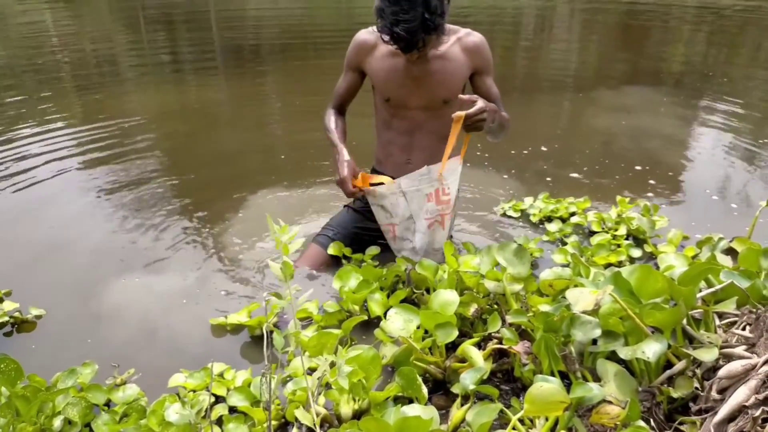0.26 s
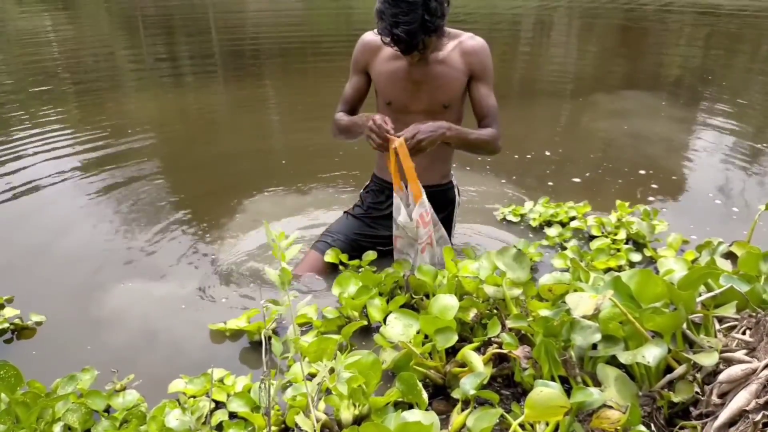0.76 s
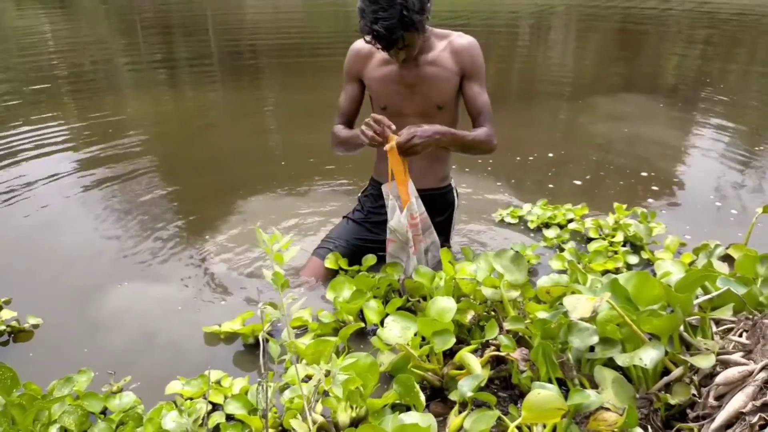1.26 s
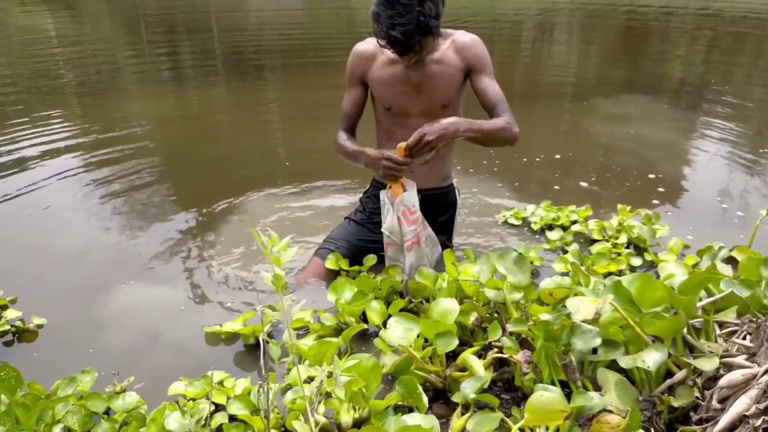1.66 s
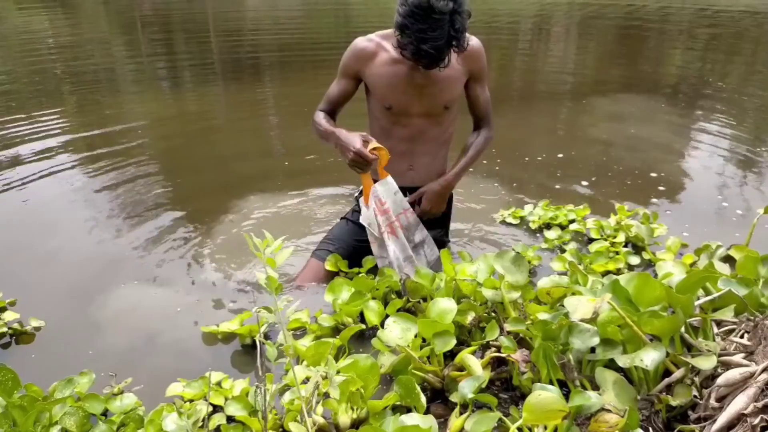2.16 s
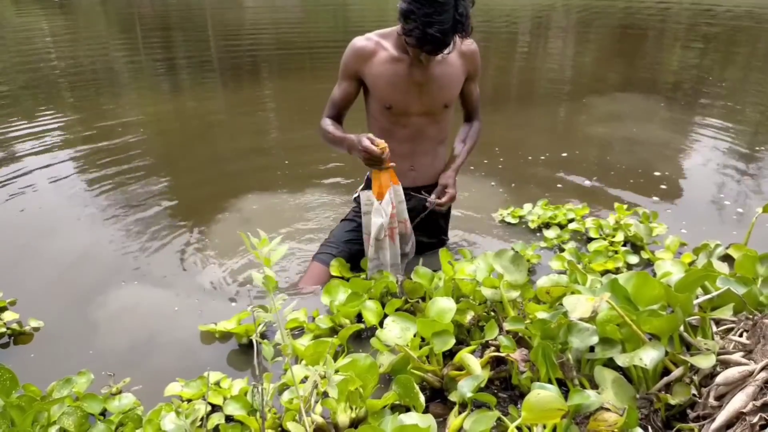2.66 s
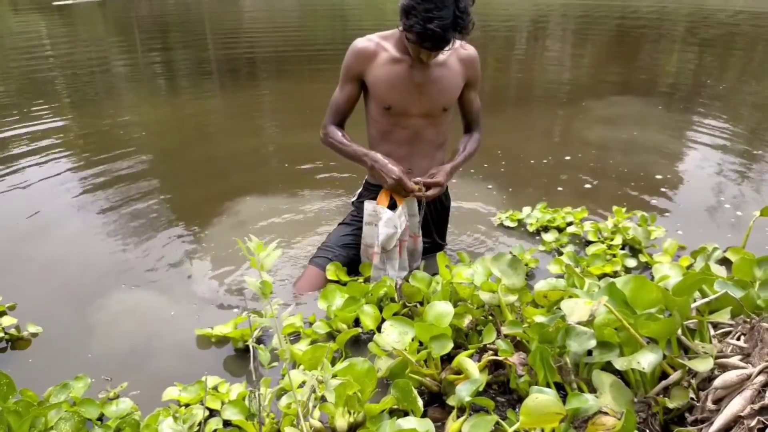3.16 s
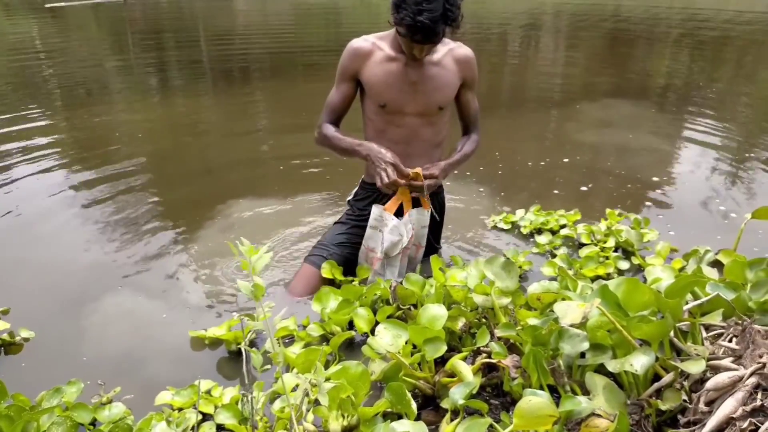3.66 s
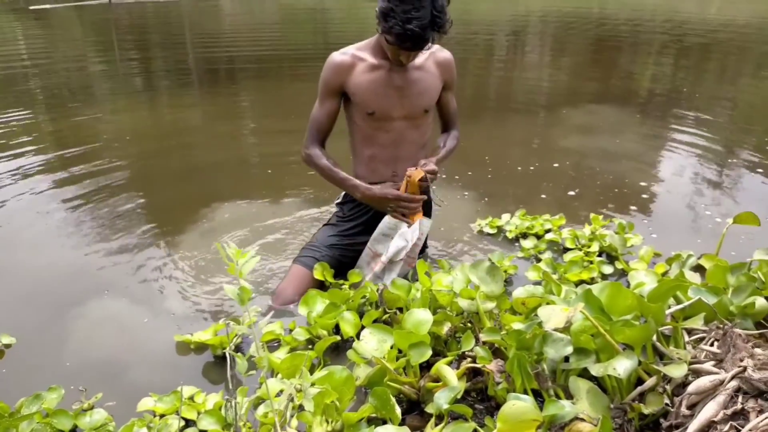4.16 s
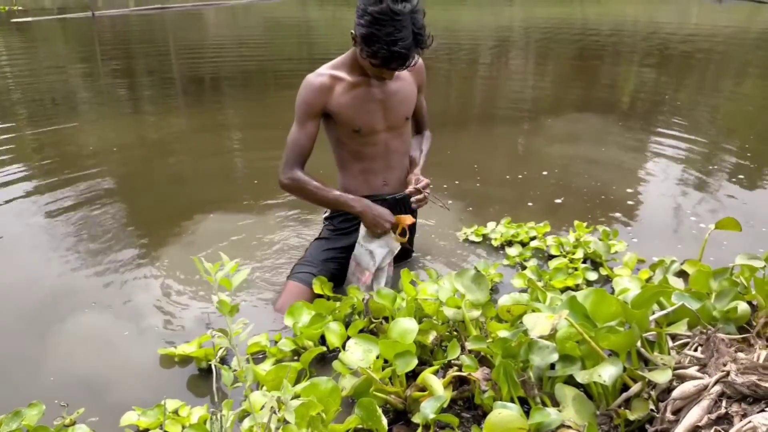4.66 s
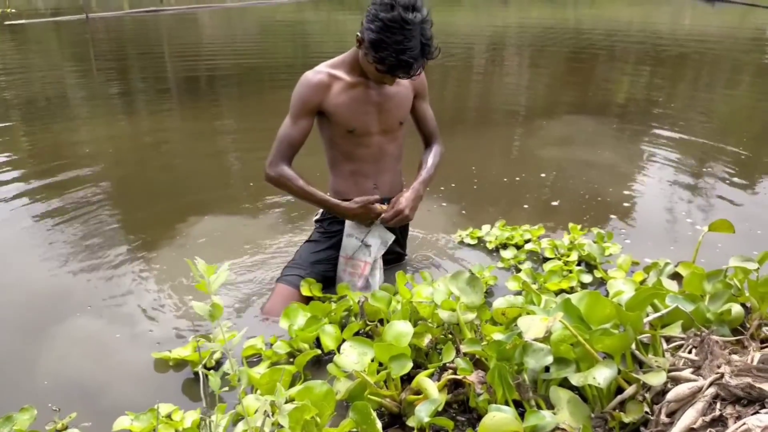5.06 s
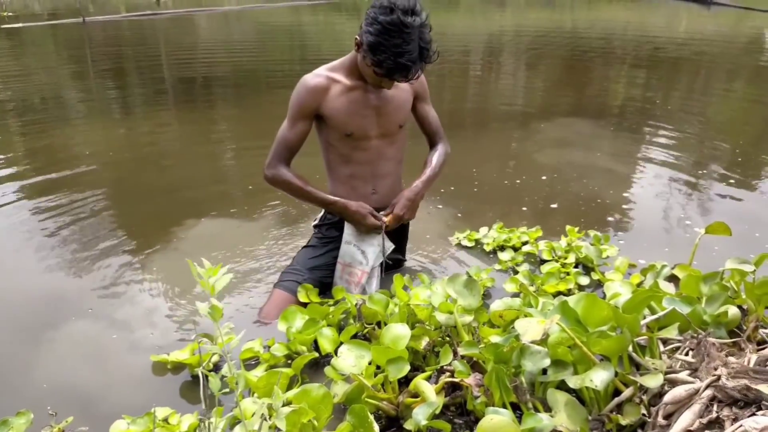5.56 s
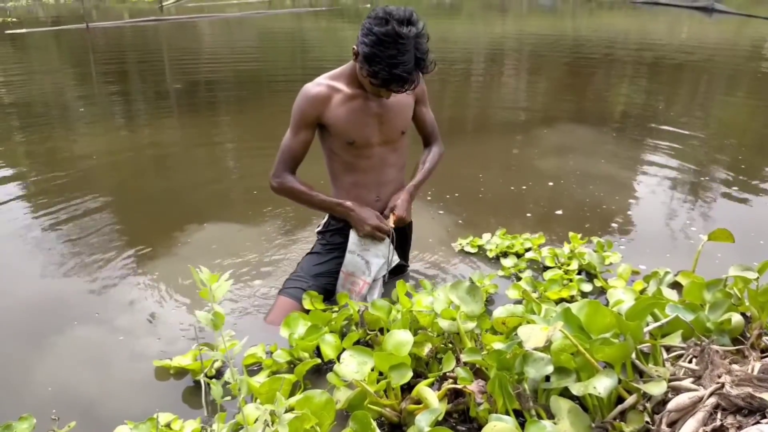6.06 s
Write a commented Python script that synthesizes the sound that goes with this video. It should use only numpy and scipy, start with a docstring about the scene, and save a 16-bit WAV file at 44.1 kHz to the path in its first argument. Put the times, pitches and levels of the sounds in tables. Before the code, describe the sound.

Someone in a still pond handles a crackling plastic bag as water plops, birds whistle, a distant engine thuds and low wind rumbles.

```python
"""A breeze buffets the microphone over the thud of a far single-cylinder engine and a soft wash of leaves.
Someone thigh-deep in a quiet pond handles a wet plastic bag: buckling film crinkles and snaps, bubbles plop and lap.
A barbet repeats its falling notes and a songbird whistles two thin phrases, gliding tones echoed by the trees.
Wind is shaped noise with single pressure swings; it dies down midway and freshens towards the end."""
import sys
import numpy as np
from scipy import signal
from scipy.fft import rfft, irfft, next_fast_len
from scipy.io import wavfile
from scipy.ndimage import uniform_filter1d

SR = 44100
rng = np.random.default_rng(int(sys.argv[2]) if len(sys.argv) > 2 else 0)


def store_pcm(level_fs):
    """Save levels as 16-bit WAV."""
    pcm = np.round(np.clip(level_fs, -1, 1) * 32767).astype(np.int16)
    wavfile.write(sys.argv[1], SR, np.atleast_2d(pcm).T)


N = 277859
T = np.arange(N) / SR  # time of each sample [s]


def undb(db):
    """Decibels to gain."""
    return 10 ** (np.asarray(db) / 20)


def unit(x):
    """Scale to rms 1."""
    return x / np.sqrt(np.mean(x ** 2) + 1e-30)


def curves(table):
    """Draw the columns of a table as automation curves, sample by sample."""
    s, *columns = np.transpose(table)
    return [np.interp(T, s, column) for column in columns]


def add(out, s, x):
    """Mix x into out at time s, kept inside the scene."""
    i = int(np.clip(s * SR, 0, N - 1))
    out[i:i + len(x)] += x[:N - i]


def walk(rate):
    """Smooth random drift with rms 1, taking about rate new values a second."""
    hold = max(int(SR / rate), 1)
    steps = rng.standard_normal(N)[np.arange(N) // hold]
    return unit(uniform_filter1d(steps, hold))


def coloured(points):
    """Noise with the given (frequency [Hz], level [dB]) spectrum, rms 1."""
    hz, db = np.transpose(points)
    length = next_fast_len(N, True)
    f = np.maximum(np.fft.rfftfreq(length, 1 / SR), 1)
    spectrum = rfft(rng.standard_normal(length))
    spectrum = spectrum * undb(np.interp(np.log(f), np.log(hz), db))
    return unit(irfft(spectrum)[:N])


def band(x, lo_hz, hi_hz, order=2):
    """Butterworth band-pass."""
    edges = [lo_hz, min(hi_hz, SR / 2 - 1)]
    return signal.sosfilt(signal.butter(order, edges, "band", fs=SR, output="sos"), x)


def trees(x, echoes, wet_db, t60):
    """Direct sound, distinct (delay [s], level [dB]) echoes from the bank, and a scattered tail from the trees."""
    t = np.arange(SR) / SR
    tail = rng.standard_normal(SR) * undb(-60 * t / t60) * (1 - np.exp(-t / 0.0012))
    response = undb(wet_db) * unit(tail) / np.sqrt(SR)
    response[0] = 1
    for s, db in echoes:
        response[int(s * SR)] += undb(db)
    return signal.fftconvolve(x, response)[:N]


def gust(peak_s, length, rise=0.39, fall=0.37, sharpness=3.9):
    """A broad-topped swell with steep sides; rise and fall are shares of its length."""
    u = (T - peak_s) / length
    return np.exp(-np.maximum(-u / rise, u / fall) ** sharpness)


def evened(x, window_s=0.07, slack=0.018):
    """Take the slow swells out of a noise and keep its fast texture."""
    power = uniform_filter1d(x ** 2, int(window_s * SR))
    return x / np.sqrt(power + slack)


# spectrum of the moving air: (frequency [Hz], relative level [dB per Hz])
AIRFLOW_SPECTRUM = [(15, 12.5), (30, 0), (50, 3), (80, -5), (120, -3), (170, -13), (250, -31.5),
                    (350, -45.5), (500, -56), (900, -67)]
# steady breeze between the gusts: (time [s], level before trim [dB])
BREEZE_LEVEL = [(0.02, -46.5), (0.61, -52.5), (1.98, -49), (2.92, -68), (4.02, -68.5), (4.15, -62),
                (4.6, -58.5), (5.51, -50.5), (5.68, -50), (5.8, -46), (6.15, -39.5), (6.3, -51)]
# gusts on the microphone:
# (peak time [s], length [s], rumble before trim [dB], flutter before trim, relative to the rumble [dB])
GUST_EVENTS = [(0.006, 0.18, -38.5, -9), (0.392, 0.32, -48, -25), (0.886, 0.037, -40, -16.5),
               (1.14, 0.042, -46, -20), (1.418, 0.14, -39, -32), (1.606, 0.058, -43.5, -14.5),
               (2.5, 0.39, -52.5, -31), (3.413, 0.21, -51.5, -24), (4.106, 0.27, -44.5, -26.5),
               (4.33, 0.072, -45.5, -25), (4.653, 0.046, -44, -29), (4.889, 0.099, -37, -16),
               (5.054, 0.19, -42.5, -16.5), (5.28, 0.25, -41, -18.5), (5.486, 0.24, -36, -14),
               (5.612, 0.055, -32, -12), (5.791, 0.13, -36.5, -13.5), (5.989, 0.15, -36.5, -23),
               (6.144, 0.24, -41, -9.5)]


def wind(breeze_db=1, gust_db=-2, eddy_db=4.5, breeze_eddy_db=-18, unrest_db=3.5, flutter_db=5.0, calm_db=-72):
    """Gusts ride on a restless breeze: large eddies rumble, small ones flutter and die out in calm air."""
    unrest = unrest_db * np.clip(walk(11), -2, 1)
    breeze = undb(curves(BREEZE_LEVEL)[0] + breeze_db + unrest)
    gusts, swirls = np.zeros(N), np.zeros(N)
    for s, length, db, small_db in GUST_EVENTS:
        swell = gust(s, length)
        gusts += undb(db + gust_db) * swell
        swirls += undb(db + small_db + eddy_db) * swell

    flow = coloured(AIRFLOW_SPECTRUM)
    flutter = flutter_db * walk(40)
    large = evened(unit(band(flow, 16.2, 96.2, order=3) * undb(flutter / 2)))
    small = evened(unit(band(flow, 192.0, 2200, order=3) * undb(flutter)))
    large_level = np.hypot(breeze, gusts)
    small_level = np.hypot(undb(breeze_eddy_db) * breeze, swirls)
    return large_level * large + np.maximum(small_level - undb(calm_db), 0) * small


def puff(hz):
    """One swing of pressure, up then down, strongest around hz; centred in a tenth of a second."""
    u = 2 * np.pi * hz * (np.arange(SR // 10) / SR - 1 / 20)
    return -u * np.exp((1 - u ** 2) / 2)


def stray_eddies(count=14, lowest_hz=55, spread_db=5, shed_db=-17):
    """Buffets at random moments, as strong as the breeze allows; columns as in BUFFET_HITS."""
    eddies = []
    for when, size, strength in rng.random((count, 3)):
        s = when * N / SR
        breeze_db = np.interp(s, *np.transpose(BREEZE_LEVEL))
        eddies.append((s, lowest_hz * 2 ** size, breeze_db + spread_db * strength, shed_db))
    return eddies


# single hard buffets, centred no earlier than 0.05 s:
# (time [s], eddy pitch [Hz], level before trim [dB], basic drop to each smaller eddy [dB])
BUFFET_HITS = [(.028, 96, -35.5, -33), (0.066, 110, -43.5, -25), (0.093, 107, -42, -24),
               (0.126, 64.7, -33, -17), (.289, 59.5, -37, -8), (0.359, 56, -32, -14), (.404, 81, -35, -9),
               (0.423, 90, -36, -16), (0.445, 84.5, -41.5, -19), (0.888, 110, -57, -14),
               (1.264, 104, -50, -9), (1.452, 123, -41.5, -19), (1.603, 140, -51, -18),
               (4.111, 99, -43, -20), (4.144, 122, -43.5, -20), (4.662, 70.5, -37.5, -16),
               (4.869, 130, -42, -21), (4.878, 101, -33, -7), (4.905, 79, -43, -10), (5.033, 85.4, -34, -5),
               (5.271, 70.5, -41, -6), (5.39, 99, -34, -24), (5.425, 127, -32, -15), (5.441, 105, -35, -15),
               (5.464, 70, -36, -19), (5.499, 123, -32, -14), (5.545, 98, -35, -10.5),
               (5.609, 119, -25, -6.5), (5.62, 90, -26.5, -9), (5.721, 99, -36.5, -21),
               (5.759, 180, -40, -24), (5.787, 94, -28.5, -18), (5.817, 88, -32.5, -20),
               (5.889, 107, -38.5, -7), (5.961, 85, -40, -11), (6.02, 49.3, -26, -8),
               (6.108, 106.5, -35.5, -17), (6.173, 106, -31, -12), (6.216, 109, -32.5, -8),
               (6.228, 151, -49, -13)]


def buffets(gain_db=-1, step=1.525, scatter_s=0.00351, count=5):
    """An eddy strikes the port squarely and breaks into ever smaller, weaker ones."""
    out = np.zeros(N)
    blows = list(BUFFET_HITS) + stray_eddies()
    for (s, hz, db, shed_db), chance in zip(blows, rng.standard_normal((len(blows), count))):
        for k, offset in enumerate(chance):
            centre = s + scatter_s * offset * min(k, 1)  # the first eddy is not scattered
            level = undb(db + gain_db + k * shed_db - k * k / 2)
            add(out, centre - 1 / 20, (-1) ** k * level * puff(hz * step ** k))
    return out


def case(x, hz=364, width_hz=33, ring_db=-6):
    """Wind that strikes the recorder makes its case ring faintly at one resonance."""
    return x + undb(ring_db) * band(x, hz - width_hz / 2, hz + width_hz / 2, order=1)


# engine speed: (time [s], firing rate [firings per second])
FIRING_RATE = [(0, 17.6), (.8, 17.88), (1.6, 18.0), (2.9, 18.2), (4.0, 18.42), (5.0, 18.65), (6.3, 18.8)]
# paths of each exhaust thud: (delay [s], pitch [Hz], relative level [dB])
EXHAUST_PATHS = [(0, 112.5, 0.5), (0.0154, 125, -13.5), (0.031, 80, -8)]
# scattered engine sound: (frequency [Hz], relative level [dB per Hz])
DRONE_SPECTRUM = [(25, -5.5), (60, -1), (130, -4.5), (200, -10), (300, -13), (420, -28.5), (900, -38)]


def engine(level_db=-59, scatter_db=2.5, drone_db=-70, start_turn=.475):
    """One exhaust thud a firing; moving air makes each path fade on its own and scatters the rest into a drone."""
    rate, = curves(FIRING_RATE)
    turns = np.floor(np.cumsum(rate) / SR + start_turn)  # start_turn: share of a firing cycle gone at 0 s
    firings = np.diff(turns, prepend=turns[0])
    out = undb(drone_db) * coloured(DRONE_SPECTRUM)
    for s, hz, db in EXHAUST_PATHS:
        strength = undb(level_db + db + scatter_db * walk(20))
        add(out, s, signal.fftconvolve(firings * strength, puff(hz), "same"))
    return out


# leaves and moving water: (time [s], level at 1.5-3 kHz before trim [dB])
RUSTLE_LEVEL = [(0.06, -71), (.45, -72.5), (1.03, -74.5), (1.5, -72.5), (2.34, -74.5), (2.7, -73.5),
                (2.89, -79.5), (4.35, -74), (4.46, -77.5), (4.82, -75), (5.06, -75), (5.39, -72.5),
                (5.55, -74), (5.66, -73), (6.02, -73.5), (6.3, -73.5)]
# fine hiss above the rustle: (time [s], level at 8.5-15 kHz before trim [dB])
HISS_LEVEL = [(0.06, -78), (0.39, -78), (0.82, -81.5), (2.63, -82), (2.79, -83), (3.0, -88), (4.04, -89.5),
              (4.14, -87), (6.3, -84)]
# spectrum of rustle and hiss: (frequency [Hz], relative level [dB per Hz])
RUSTLE_SPECTRUM = [(240, 10.5), (400, -3), (577, 2), (652, -1), (833, 0.5), (970, -1.5), (1030, -1.5),
                   (1200, -1.5), (1810, -4), (2500, -4.5), (3240, -10.5), (4400, -21), (5880, -32),
                   (11900, -30.5), (15400, -27)]


def leaves(rustle_db=-3.5, hiss_db=0.5, split_hz=5200):
    """A soft wash of foliage and ripples, noise whose fine hiss flickers."""
    (db,), (fine_db,) = curves(RUSTLE_LEVEL), curves(HISS_LEVEL)
    air = coloured(RUSTLE_SPECTRUM)
    wash = band(air, 300, split_hz, order=4) / np.std(band(air, 1500, 3000, order=4))
    hiss = band(air, split_hz, 20000, order=4) / np.std(band(air, 8500, 15000, order=4))
    sway_db, flicker_db = 1.1 * walk(30), 1.2 * walk(90)
    return wash * undb(db + rustle_db + sway_db) + hiss * undb(fine_db + hiss_db + flicker_db)


# crinkles of the bag: (time [s], twice the time to the peak [s], top of the film's band [Hz], level [dB])
BAG_CRINKLES = [(0.251, 0.0037, 3440, -70), (0.285, 0.014, 3900, -71), (0.31, 0.0073, 3800, -70),
                (0.01, 0.1, 6060, -84.5), (0.405, 0.069, 4470, -74), (0.278, 0.17, 8600, -89),
                (0.42, 0.053, 10400, -78.5), (0.49, 0.012, 4100, -78), (1.853, 0.026, 7560, -78),
                (2.06, 0.06, 11500, -78.5), (3.472, 0.025, 12000, -77), (4.824, 0.082, 3900, -77),
                (6.279, 0.012, 9000, -76)]


def bag(edge_db=-6, grain_db=6.0):
    """Thin film buckles in clusters of tiny snaps, each with its own pitch and a broader edge mixed in."""
    out = np.zeros(N)
    grains = unit(rng.standard_normal(N) * undb(grain_db * walk(1500)))
    for s, length, hz, db in BAG_CRINKLES:
        t = np.arange(int(4 * length * SR)) / SR
        cluster = np.roll(grains, -int(s * SR))[:len(t)]
        film = unit(band(cluster, hz * 0.52, hz * 0.97))
        edge = unit(band(cluster, hz * 0.21, 8000))
        swell = (2 * t / length) * np.exp(1 - 2 * t / length)
        add(out, s, undb(db) * (film + undb(edge_db) * edge) * swell)
    return out


def bubble(hz, t60, rise=0.12):
    """A trapped bubble rings, its pitch rising as it nears the surface by twice the share given as rise."""
    t = np.arange(int(t60 * SR)) / SR
    tone = np.sin(2 * np.pi * hz * t * (1 + rise * t / t60))
    return tone * 1000 ** (-t / t60) * (1 - np.exp(-t / 0.00023))


# plops in the water:
# (time [s], starting bubble pitch [Hz], ring t60 [s], half the pitch rise [share], level [dB])
WATER_PLOPS = [(0.121, 990, 0.025, .1, -47), (.1215, 640, 0.062, .5, -48.5), (0.136, 1000, 0.03, 0.18, -63),
               (.233, 568, 0.035, 0.12, -53.5), (.247, 500, 0.022, .14, -47.5),
               (1.62, 547, 0.077, .14, -64), (1.665, 547, 0.043, .14, -64), (2.237, 496, 0.028, .14, -62),
               (2.515, 538, 0.092, 0.085, -65), (2.915, 448, 0.067, .2, -66),
               (4.794, 1245, 0.043, 0.15, -49)]


def water(lap_db=-76, spread_db=4, count=70):
    """Distinct plops, and ripples that close over tiny bubbles around the legs."""
    out = np.zeros(N)
    for s, hz, t60, rise, db in WATER_PLOPS:
        add(out, s, undb(db) * bubble(hz, t60, rise))
    for when, size, strength in rng.random((count, 3)):
        hz = 400 * 5 ** size
        add(out, when * N / SR, undb(lap_db + spread_db * 2 * strength) * bubble(hz, 25 / hz))
    return trees(out, [], wet_db=-16.0, t60=0.94)


def throat(hz, overtone_db, resonance_hz=8000, width_hz=500):
    """A pure tone; the throat lets its octave through mainly near its own resonance."""
    phase = 2 * np.pi * np.cumsum(hz) / SR
    octave = undb(overtone_db) / (1 + ((2 * hz - resonance_hz) / width_hz) ** 2)
    return np.sin(phase) + octave * np.sin(2 * phase)


def whistle(table, overtone_db, rasp_depth=0.02, wander=0.0071, waver_db=2.2):
    """Thin held tones that waver in strength; in the raspy ones the pitch trembles and wanders."""
    out = np.zeros(N)
    tremble = rasp_depth * walk(260) + wander * walk(28)
    for s, length, first_hz, last_hz, db, rasp in table:
        n = int(length * SR)
        shake = 1 + rasp * np.roll(tremble, -int(s * SR))[:n]
        hz = np.linspace(first_hz, last_hz, n) * shake
        add(out, s, undb(db) * signal.windows.tukey(n, .65) * throat(hz, overtone_db))
    return out * undb(waver_db * walk(45))


def chorus(level_db=-88, spread_db=8, count=30):
    """Many more birds at the edge of hearing, short raspy whistles at random times and pitches."""
    calls = []
    for when, length, pitch, slide, size in rng.random((count, 5)):
        first_hz = 1400 * 2.4 ** pitch
        last_hz = first_hz * (1.0 + 0.11 * slide)
        calls.append((when * (N / SR - .2), .04 + 0.15 * length, first_hz, last_hz,
                      level_db + spread_db * size, .7))
    return whistle(calls, overtone_db=-32)


# the songbird's long notes near 4 kHz, a curve each: (time [s], pitch [Hz], level before trim [dB])
UPPER_PHRASES = [
    [(1.32, 3970, -85), (1.38, 3993, -70.5), (1.512, 4010, -69), (1.528, 4013, -89), (1.538, 4010, -60.5),
     (1.63, 3950, -79), (1.644, 3970, -66.5), (1.712, 3974, -86), (1.728, 3950, -76.5), (1.834, 3970, -88),
     (1.86, 4100, -88)],
    [(5.75, 4044, -94), (5.776, 4030, -71.5), (5.832, 4001, -62), (5.854, 4017, -72.5), (5.932, 3937, -67),
     (5.958, 4010, -82), (5.984, 3960, -67.5), (6.002, 3955, -77), (6.078, 3960, -81), (6.112, 3963, -96),
     (6.12, 3977, -81)],
]
# the lower notes that follow them: (time [s], pitch [Hz], level before trim [dB])
LOWER_PHRASES = [
    [(1.86, 3310, -95), (1.892, 3340, -67), (2.008, 3324, -66.5), (2.07, 3335, -77), (2.102, 3316, -66),
     (2.132, 3326, -83), (2.278, 3319, -90), (2.32, 3325, -100)],
    [(6.05, 3355, -99), (6.058, 3320, -86), (6.114, 3300, -67), (6.142, 3311, -63), (6.164, 3340, -74),
     (6.176, 3304, -64.5), (6.22, 3310, -61.5), (6.3, 3309, -78)],
]
# thin notes above both: (time [s], pitch [Hz], level before trim [dB])
THIN_PHRASES = [
    [(2.01, 6280, -93), (2.068, 6325, -72), (2.214, 6330, -75.5), (2.23, 6310, -67.5), (2.37, 6303, -96),
     (2.394, 6312, -82), (2.45, 6340, -99)],
    [(5.65, 6348, -94), (5.702, 6370, -66.5), (5.74, 6350, -66), (5.776, 6380, -87), (5.788, 6380, -75),
     (5.958, 6360, -88), (6.0, 6360, -103)],
    [(6.17, 6304, -99), (6.188, 6370, -79), (6.236, 6314, -78), (6.254, 6330, -66.5), (6.286, 6308, -77),
     (6.3, 6334, -77)],
]


def held_notes(overtone_db=-16, waver_db=1.5, wander=.001, fade_s=0.017):
    """Long pure notes that swell and die away, each on its own curve of pitch and level."""
    out = np.zeros(N)
    for note in list(UPPER_PHRASES) + list(LOWER_PHRASES) + list(THIN_PHRASES):
        hz, db = curves(note)
        inside = np.minimum(T - note[0][0], note[-1][0] - T)
        sounding = np.clip(inside / fade_s + 1, 0, 1)
        tone = throat(hz * (1 + wander * walk(40)), overtone_db)
        out += np.sqrt(2) * undb(db) * sounding * tone
    return out * undb(waver_db * walk(45))


# the songbird's short chirps:
# (time [s], length [s], first pitch [Hz], last pitch [Hz], level [dB], rasp [0-1])
CHIRPS = [(2.085, 0.055, 6680, 6480, -78, 0.4), (5.615, 0.05, 5860, 5900, -73.5, 0.4),
          (5.64, 0.2, 5970, 5930, -74.5, 0.55), (5.60, 0.16, 4060, 4200, -82, .8),
          (6.12, 0.21, 6610, 6630, -83, 0.2)]
# other birds far off:
# (time [s], length [s], first pitch [Hz], last pitch [Hz], level before trim [dB], rasp [0-1])
DISTANT_CALLS = [(.14, 0.089, 2680, 2770, -71, 0), (.77, 0.087, 2210, 2140, -73.5, 0.35),
                 (1.26, 0.14, 2335, 2340, -74, 0.37), (1.66, 0.093, 2950, 2950, -78, .1),
                 (2.09, 0.085, 1564, 1565, -71.5, 1), (2.27, 0.19, 2940, 2940, -79.5, 0.04),
                 (2.31, 0.12, 3100, 3100, -88, 0.2), (2.5, .1, 3100, 3105, -79.5, 0),
                 (3.53, 0.17, 1513, 1610, -72.5, 0.9), (3.72, 0.37, 1562, 1553, -79.5, 0.43),
                 (3.68, 0.2, 2380, 2540, -83, 0.6), (3.86, 0.66, 1816, 1830, -78, 0.67),
                 (4.32, 0.037, 4300, 4500, -77, 0.7), (5.49, 0.022, 4500, 4400, -71, 0.7),
                 (5.16, 0.12, 1890, 1900, -77, 0.2), (5.25, 0.21, 2060, 2120, -79, 0.65),
                 (5.61, 0.12, 1852, 1836, -68.5, 0.65), (5.63, 0.089, 1755, 1464, -70, 0.9),
                 (5.68, 0.33, 1997, 1927, -73.5, 0.5), (5.55, 0.46, 2650, 2634, -80, 0.3),
                 (5.88, 0.12, 2940, 2960, -73, .2), (6.13, 0.15, 3110, 3080, -75, 0.1),
                 (6.185, 0.12, 605, 580, -64.5, .6)]


def songbirds():
    """A whistler in the nearer trees, with short chirps around its notes; other birds behind it."""
    song = trees(held_notes(), [], wet_db=-6.5, t60=1.0)
    near = trees(whistle(CHIRPS, overtone_db=-15.5), [(.10, -10.5)], wet_db=-7.0, t60=1.25)
    far = trees(whistle(DISTANT_CALLS, overtone_db=-29) + chorus(), [], wet_db=-5.5, t60=0.99)
    return undb(-0.5) * song + near + undb(-3.5) * far


# barbet calls: (time [s], level before trim [dB])
BARBET_CALLS = [(0.324, -53), (1.061, -54), (1.758, -54), (2.462, -55), (3.16, -58), (3.876, -56.5),
                (4.581, -55.5), (5.278, -51.5), (5.995, -50.5)]
# tones of one call, before scatter:
# (delay [s], length [s], top pitch [Hz], last pitch [Hz], relative level [dB])
CALL_NOTES = [(-.124, .032, 865, 790, -18), (-.0085, .0245, 1275, 880, 0), (.0655, .022, 1130, 900, 0),
              (.1395, .021, 1135, 970, .5), (.166, .02, 1110, 920, -9)]


def barbet(gain_db=4.5, crest=0.17, scoop=0.08, pitch_scatter=0.009, length_scatter=0.066):
    """Each note is a pure tone that scoops up to its top pitch, then slides down as it swells and fades."""
    out = np.zeros(N)
    for s, db in BARBET_CALLS:
        for delay, length, top_hz, last_hz, note_db in CALL_NOTES:
            sharp, longer, louder = rng.standard_normal(3)
            u = np.linspace(0, 1, int(length * (1 + length_scatter * longer) * SR))
            rise = 1 - scoop * np.clip(1 - u / crest, 0, 1) ** 2
            fall = np.sin(np.pi / 2 * np.clip((u - crest) / (1 - crest), 0, 1)) ** 2
            hz = top_hz * rise + (last_hz - top_hz) * fall
            phase = 2 * np.pi * np.cumsum(hz * (1 + pitch_scatter * sharp)) / SR
            swell = np.abs(np.sin(np.pi * u ** 1.1)) ** .85
            add(out, s + delay, undb(db + note_db + gain_db + louder / 2) * swell * np.sin(phase))
    return trees(out, [(.0045, -21.5), (.016, -12), (.047, -26)], wet_db=-9.5, t60=0.95)


# single sharp snaps of the bag: (time [s], pitch [Hz], ring t60 [s], ring level [dB])
BAG_SNAPS = [(.2342, 13500, .022, -70), (0.246, 3360, 0.029, -55.5), (.248, 12500, 0.024, -63),
             (.269, 3650, .02, -68), (.289, 3400, 0.022, -66), (.31, 2900, .025, -63),
             (.497, 3600, .035, -63.5), (.444, 12000, 0.027, -62), (.449, 3900, 0.04, -62),
             (.582, 8000, .015, -69), (1.095, 3120, 0.026, -60), (1.682, 11200, 0.007, -54.5),
             (1.8527, 13600, .018, -60), (3.464, 12600, 0.027, -70), (3.787, 13000, .03, -71.5),
             (4.923, 9900, 0.011, -67), (5.157, 2600, .03, -73)]


def snaps(crack_db=-13, crack_t60=0.019):
    """A single fold of the film pops over: a sudden crack and a very short ring, both decaying noise."""
    out, t = np.zeros(N), np.arange(SR // 20) / SR
    for s, hz, t60, db in BAG_SNAPS:
        noise = rng.standard_normal((2, len(t)))
        ring = unit(band(noise[0], hz * 0.84, hz * 1.2)) * undb(-60 * t / t60)
        crack = unit(band(noise[1], hz * 0.67, hz * 2.9)) * undb(crack_db - 60 * t / crack_t60)
        add(out, s, undb(db) * (ring + crack))
    return out


def scene():
    """Everything as it reaches one microphone on the bank."""
    air = case(wind() + buffets()) + leaves()
    pond = bag() + snaps() + water()
    distance = engine() + songbirds() + barbet()
    return (air + pond + distance)[None]


def record(dry, top_hz=15550):
    """The recorder cuts the top with a steep elliptic low-pass."""
    return signal.sosfilt(signal.ellip(10, .2, 70, top_hz, fs=SR, output="sos"), dry)


dry = scene()
out = record(dry)
store_pcm(out)
```